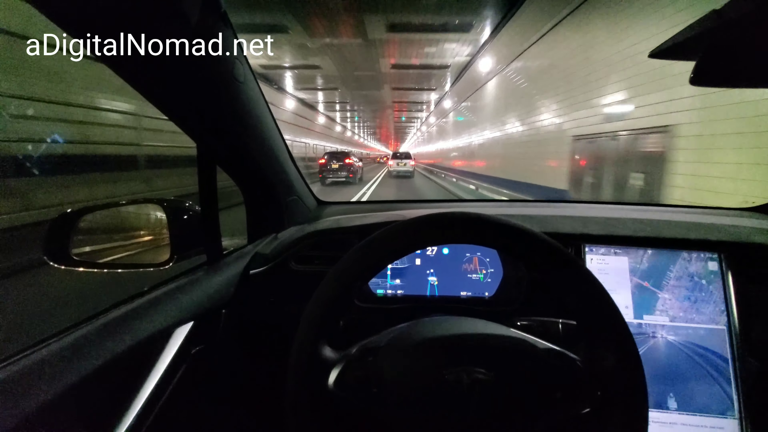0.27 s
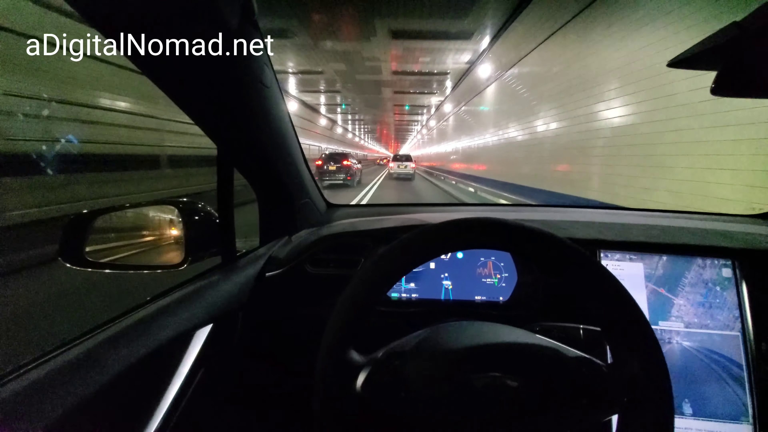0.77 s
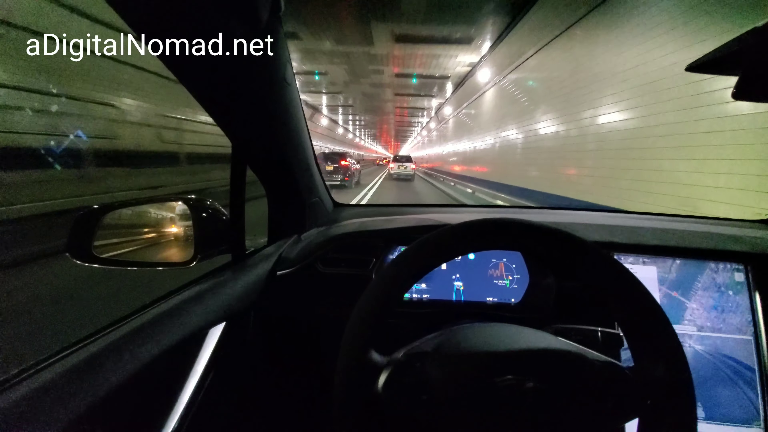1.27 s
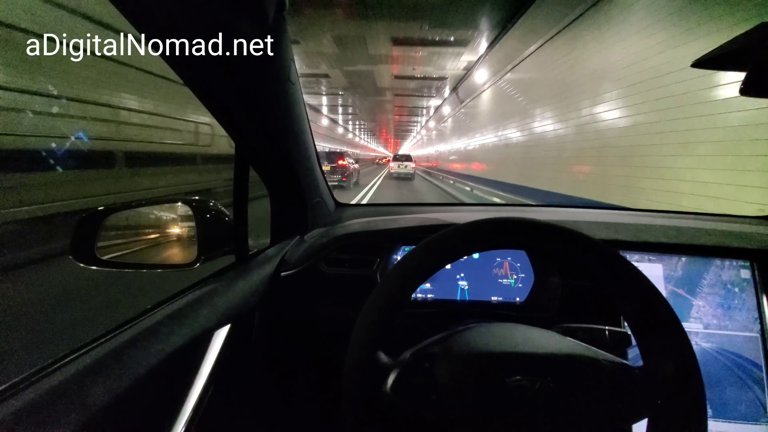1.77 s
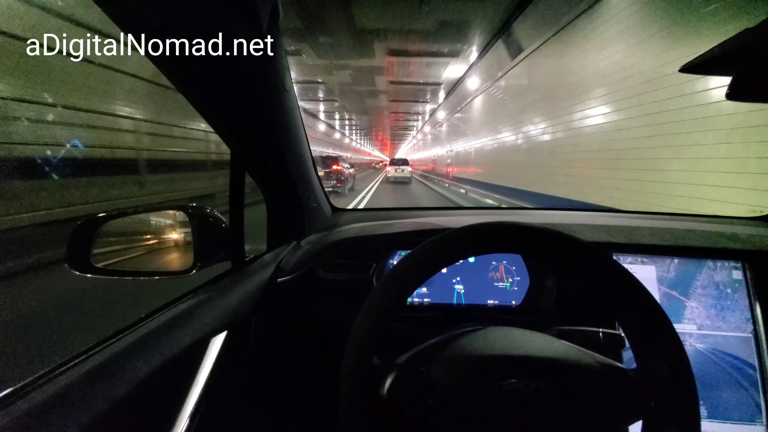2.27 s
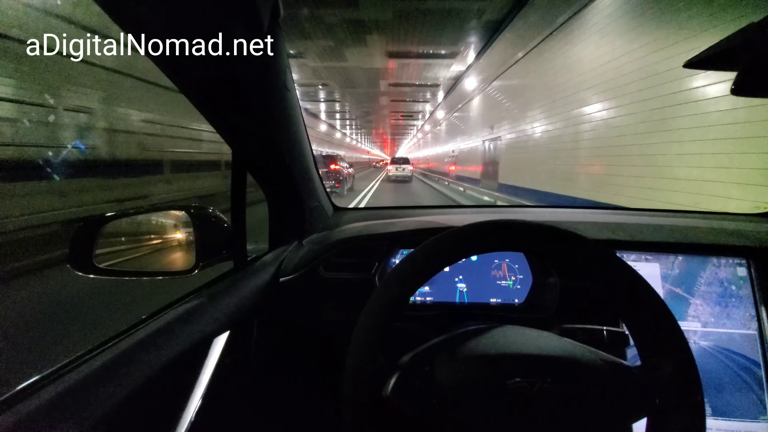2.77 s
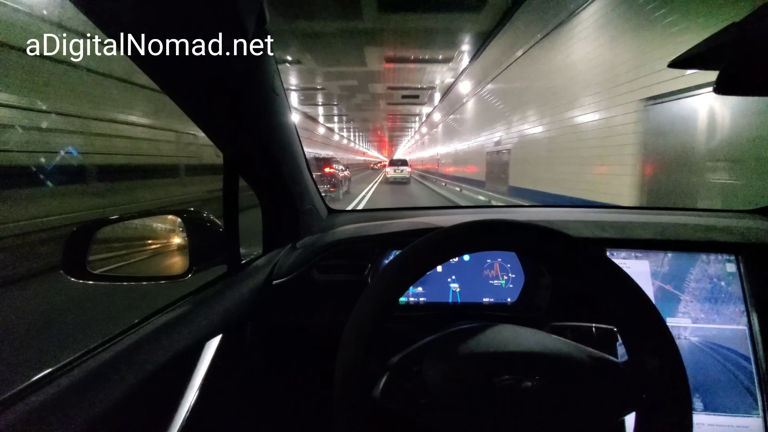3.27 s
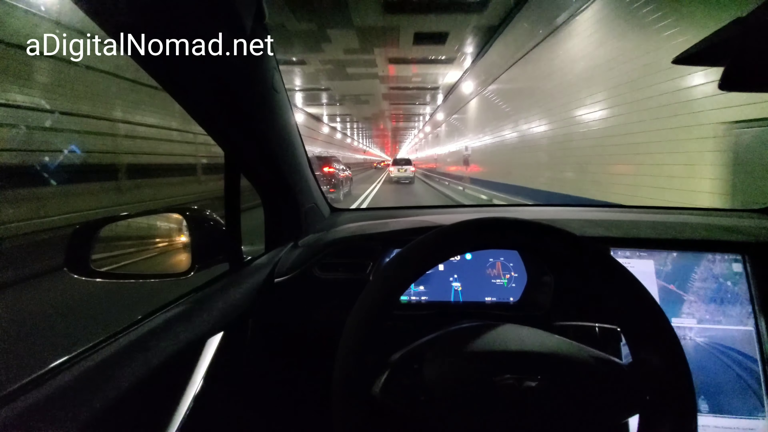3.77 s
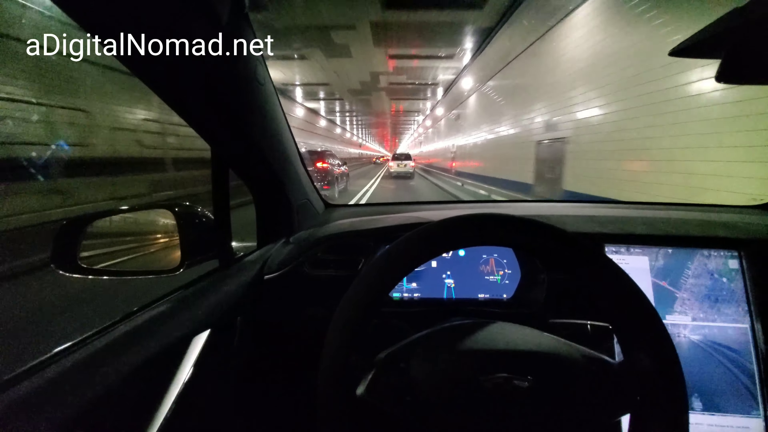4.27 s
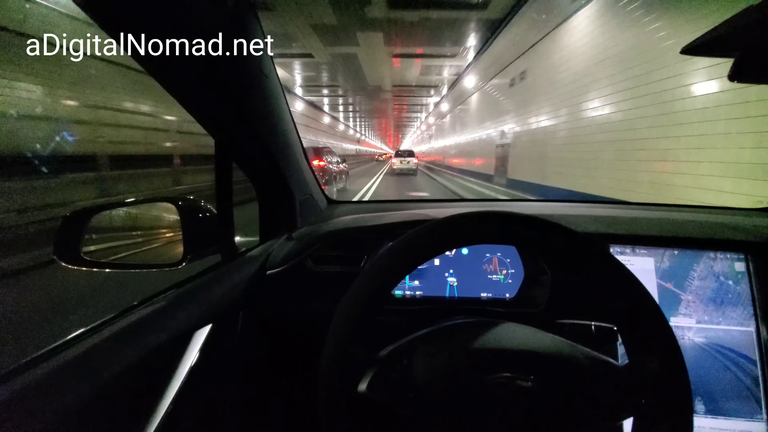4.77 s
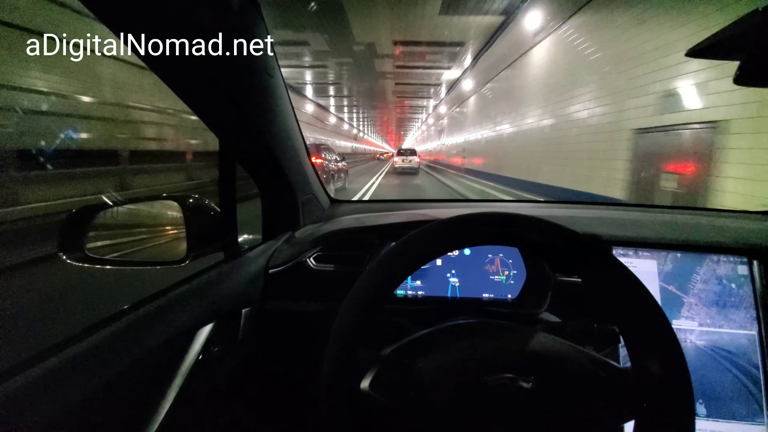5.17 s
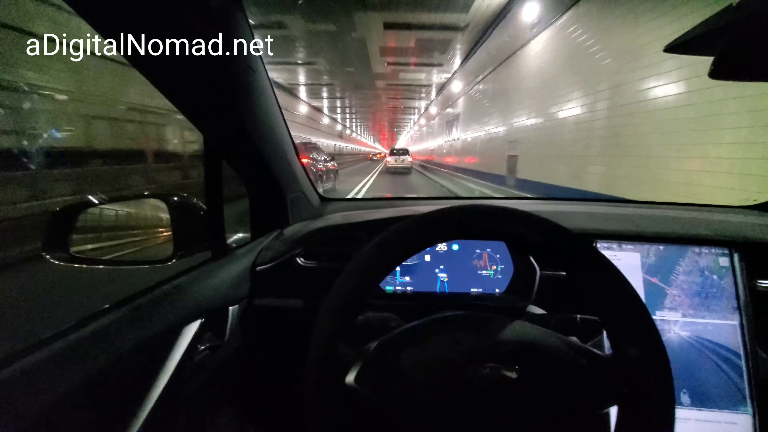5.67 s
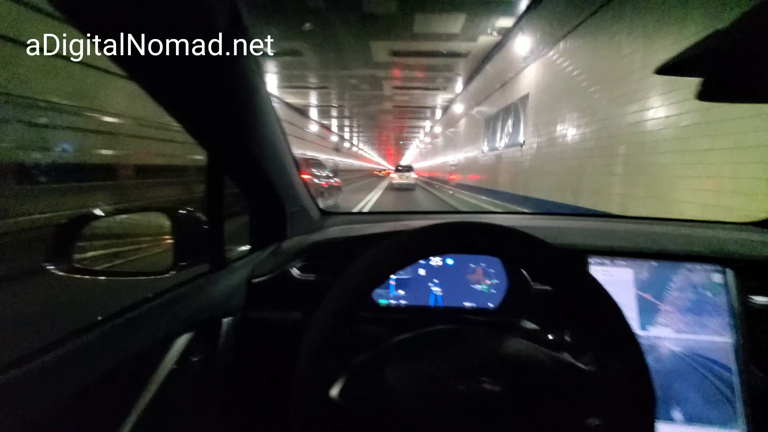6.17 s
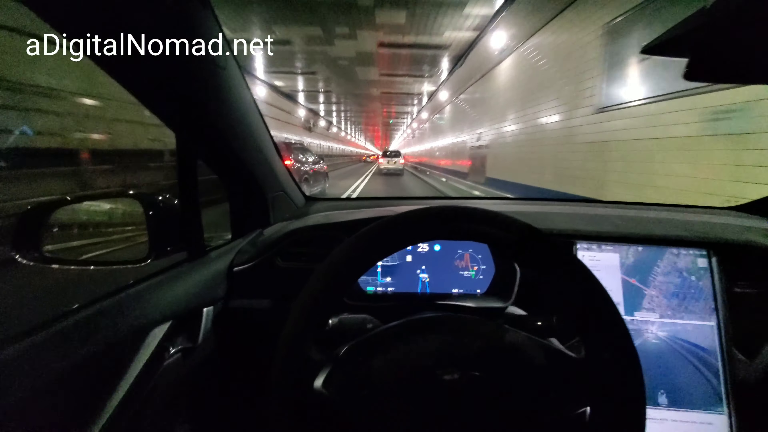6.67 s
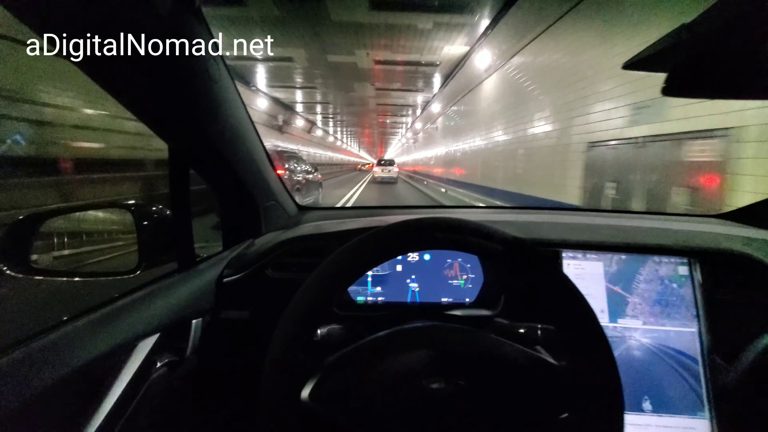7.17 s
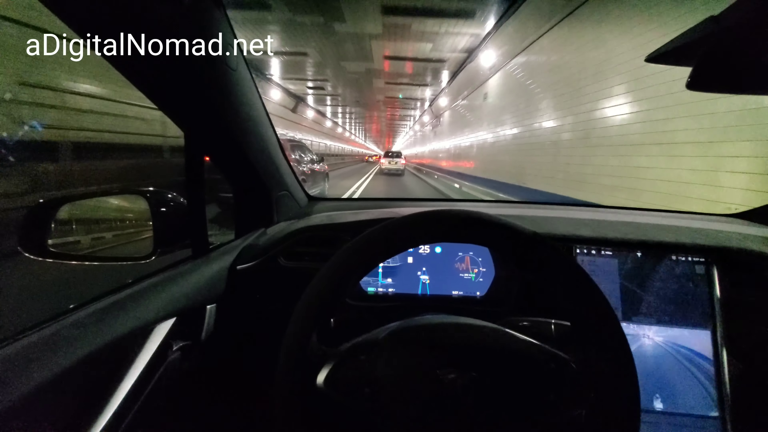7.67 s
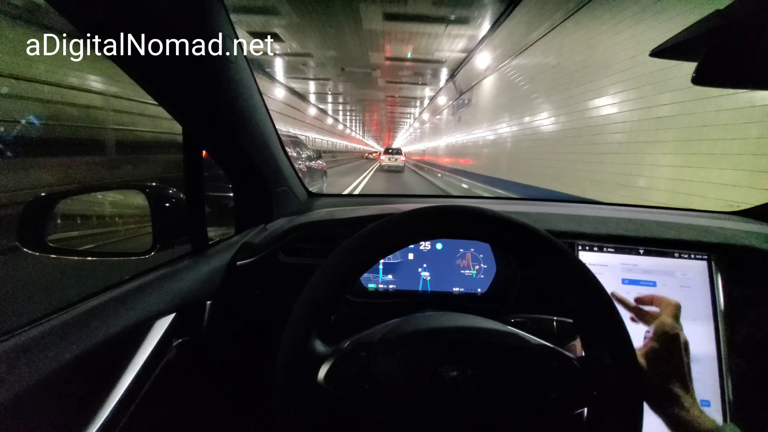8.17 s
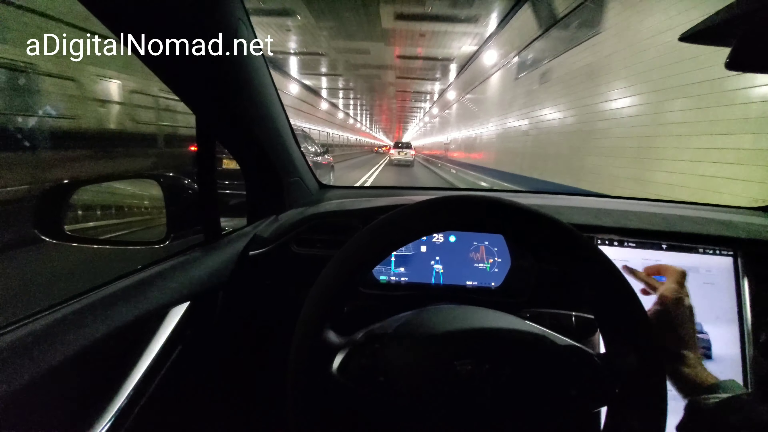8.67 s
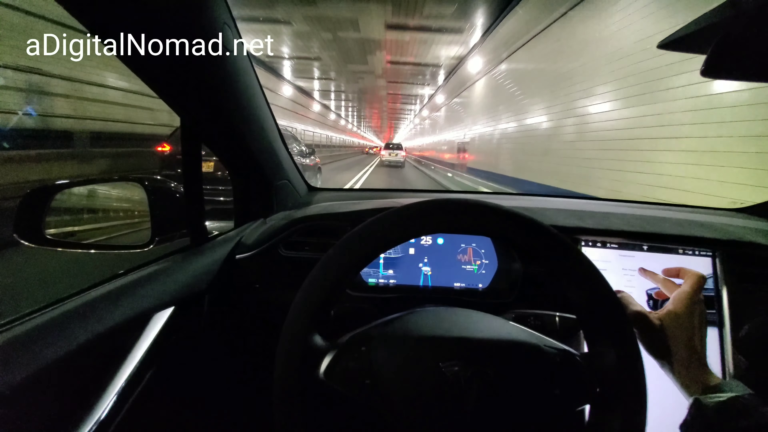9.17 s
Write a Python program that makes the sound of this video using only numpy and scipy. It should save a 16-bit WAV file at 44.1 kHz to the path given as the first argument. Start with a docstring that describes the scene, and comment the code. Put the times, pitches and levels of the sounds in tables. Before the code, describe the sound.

A handheld stereo microphone inside a closed car picks up boomy bass rumble, cabin drone and a wavering low hum. Front then rear wheels zip over ribs with a resonant, tunnel-tailed whoosh. Deep paired thumps rattle loose trim and briefly push the background down. A finger clicks and scuffs very close on the right, another ribbed strip rasps and sings with lighter knocks, then smooth rolling returns with slight sleeve rustle.

```python
"""A low body rumble, drivetrain hum and dull tyre roar: inside an electric car rolling through a road tunnel.
Filtered noise makes the rumble and roar, wavering sines of one turning shaft the hum.
Front and rear axle rasp over two ribbed strips (resonant noise); bumps at a joint between them and on the
second strip thud (body modes struck by pushes), rattle the trim and duck the gain.
Close by, a sleeve rustles, a finger clicks and scuffs on the camera, then brushes the touch screen."""
import sys
import numpy as np
from scipy import signal
from scipy.fft import rfft, irfft, next_fast_len
from scipy.io import wavfile

SR = 44100
rng = np.random.default_rng(int(sys.argv[2]) if len(sys.argv) > 2 else 0)


def waveform_to_disk(signal):
    """Save audio, clipped to [-1, 1], as 16-bit WAV at the path in sys.argv[1]."""
    frames = np.transpose(np.atleast_2d(signal))
    scaled = np.clip(frames, -1, 1) * 32767
    samples = np.round(scaled).astype(np.int16)
    wavfile.write(sys.argv[1], SR, samples)


N = 415422
T = np.arange(N) / SR
SIZE = next_fast_len(N, real=True)
HZ = np.maximum(np.arange(SIZE // 2 + 1) * SR / SIZE, 1)

# All spectra below are relative: f/Hz, level per Hz/dB.
# road surface: t/s, unevenness/dB, coarseness of its grain/dB
ROAD_SURFACE = [(0.4, 2.5, -0.7), (1.7, -2, -1.4), (2.6, 0.6, 0.2), (4.6, 0, 0.5), (5.5, 5, 2),
                (7.3, -1.5, -2), (9.4, 0, -1)]
# spectrum of body rumble: f/Hz, level/dB
RUMBLE_SPECTRUM = [(11, -32.5), (18, -13), (38, 5), (81, 2), (100, 2), (130, -36), (220, -120)]
# spectrum of cabin-air drone: f/Hz, level/dB
DRONE_SPECTRUM = [(80, -27), (100, 0), (125, 1), (155, -2), (195, -10.5), (260, -12), (345, -15.5),
                  (378, -11), (410, -17.5), (480, -20.5), (700, -42)]
# spectrum of tyre roar: f/Hz, level/dB
ROAR_SPECTRUM = [(250, -41.5), (420, -12.5), (466, -12), (533, -2.5), (636, -4), (815, -0.5), (1050, -7.5),
                 (1290, -10), (1930, -10.5), (2420, -16.5), (3010, -17.5), (3630, -25.5), (4240, -37),
                 (5000, -47), (6500, -78.5), (11000, -120)]
# drivetrain: t/s, pitch of the third shaft order f/Hz
THIRD_ORDER_PITCH = [(0, 107.3), (1.8, 107.1), (3.3, 106.4), (5.5, 106), (6.9, 108.5), (8.16, 111.9),
                     (8.8, 114.2), (9.42, 114.7)]
# steady shaft orders: order -> level/dB
STEADY_ORDERS = {3: -32, 4: -38.5, 8: -52}
# an order booms for a while: order, middle t/s, half length/s, level/dB
ORDER_BOOMS = [(3, 0.67, 0.76, -22.5), (3, 7.65, 0.55, -22), (4, 3.7, 2.1, -38), (8, 3.26, 0.13, -37.5),
               (8, 2.7, 0.69, -47.5), (4, 8.5, .45, -37.5)]
# fingertip on the touch screen: t/s, level/dB, swell/s, t60/s
SCREEN_BRUSHES = [(8.393, -68, .01, .09), (8.432, -68, .015, .15), (8.464, -66, .012, .1),
                  (8.93, -75, .02, .4), (9.05, -74, 0.034, 0.12)]
# spectrum of skin on glass: f/Hz, level/dB
BRUSH_SPECTRUM = [(3600, -4), (4250, 1), (5000, -9), (6200, -3), (8000, -10)]
# strokes of the sleeve: t/s, level/dB, swell/s, hold/s, t60/s
SLEEVE_STROKES = [(0, -80, 0.016, 0.45, 0.7), (0.475, -61.5, 0.35, 0.53, 1.4),
                  (2.95, -74, .06, 0.022, 0.82), (3.584, -69, 0.052, 0.018, 0.4), (3.8, -70, 0.36, 1, 2),
                  (5.48, -58, 0.14, 0.35, 6.3), (6.195, -61.5, 0.45, 0.27, 0.32),
                  (7.095, -65.5, 0.31, 0.36, 1.36), (7.799, -69, 0.42, 0.35, 4.2),
                  (8.59, -66, 0.055, .02, .3)]
# spectrum of sliding cloth: f/Hz, level/dB
CLOTH_SPECTRUM = [(1500, -4), (4000, -1), (6000, -1.5), (8000, -3.5), (11000, -3), (15000, 2.5)]
# finger on the camera: t/s, tick level/dB, tick t60/s, knock level/dB, knock pitch f/Hz
FINGER_CLICKS = [(6.2166, -36, 0.0022, -60, 2000), (6.227, -22, .0013, -28, 795),
                 (6.234, -29, 0.0051, -27, 560), (6.236, -20, 0.0016, -13.5, 2120),
                 (6.2543, -27, .003, -25, 1140)]
# modes of the camera case: ratio to the knock pitch, level/dB
CASE_MODES = [(.88, -0.5), (1.15, -0.5), (2.2, -6)]
# spectrum of skin scuffing the case: f/Hz, level/dB
SCUFF_SPECTRUM = [(500, 4), (1200, 0), (3000, -1), (6000, -6), (9500, -0.5), (15000, -14)]
# loose trim rattles: t/s, level/dB, f/Hz, t60/s
TRIM_RATTLES = [(5.553, -45.5, 1700, .16), (5.662, -50, 1400, .12), (5.932, -44, 1620, 0.082),
                (6.555, -33, 323, .35), (6.57, -34.5, 960, 0.27)]
# panel set ringing by a bump: f/Hz, level/dB, t60/s
PING_MODES = [(597, -30, 0.27), (760, -40, .06), (340, -29, .08)]
# shaken trim sizzles: t/s, level/dB, swell/s, t60/s
TRIM_SIZZLES = [(5.549, -39, 0.013, 0.11), (5.612, -45.5, .018, .15), (5.805, -41.5, 0.016, .15),
                (5.823, -37, .004, .06), (5.925, -45, .003, .05)]
# spectrum of sizzling trim: f/Hz, level/dB
TRIM_SPECTRUM = [(500, 16.5), (2300, 7.5), (4500, -1), (9000, -10.5), (15000, -0.5)]
# axle on a ribbed strip: t/s, level/dB, swell/s, time on strip/s, t60/s, rasp level/dB,
# top edge of the ring f/Hz, tunnel tail level/dB, pitch ratio
AXLE_CROSSINGS = [(4.634, -31.5, 0.073, 0.053, 0.74, -3.5, 4600, -12.5, 0.99),
                  (4.848, -32.3, 0.13, 0.05, .95, -4, 4600, -10.5, .998),
                  (6.512, -34.5, 0.062, 0.038, 0.62, -1, 1960, -13.5, 1.007),
                  (6.83, -37.5, 0.11, 0.044, .95, -0.5, 4580, -9, .98)]
# tyre and strip resonances: f/Hz, -3 dB width/Hz, level/dB
STRIP_RESONANCES = [(405, 53, 4.5), (673, 136, 0.5), (815, 80, -7), (1030, 82, -3), (1244, 60, -3),
                    (1494, 80, -6.5), (1895, 115, -5.5), (2050, 100, -3.5), (2490, 200, -7),
                    (2860, 170, -8.5), (3090, 120, -3), (3610, 180, -13.5), (4170, 220, -22.5),
                    (5150, 160, -31), (6000, 100, -25)]
# spectrum of rib rasp through the bodywork: f/Hz, level/dB
RASP_SPECTRUM = [(90, -12.5), (160, 10.5), (270, -5.5), (750, -11), (1400, -11.5), (3100, -13), (4000, -23),
                 (5800, -30.5), (7500, -45)]
# singing front tyres on the second strip: f/Hz, -3 dB width/Hz, level/dB
SQUEAL_RESONANCES = [(866, 50, -3.5), (1104, 77, -5), (1860, 90, -7.5), (2467, 24, 1.5), (2646, 85, -4),
                     (3570, 150, -17), (4050, 60, -21), (4340, 55, -17.5), (5110, 50, -23.5),
                     (5880, 80, -27.5)]
# wheel bumps: t/s, push level/dB, length of first push/s, loss per rebound/dB, panel shudder level/dB
WHEEL_JOLTS = [(5.562, -12, 0.013, 0.5, -26.5), (5.824, -10, 0.013, -1, -31),
               (6.521, -21.5, 0.0056, 1, -31), (6.796, -17.5, 0.00422, 3.5, -38),
               (6.873, -17, 0.01083, 2, -55.5)]
# modes of the car body: f/Hz, level/dB, t60/s
BODY_MODES = [(46.1, -6, 0.36), (69.4, 8.5, 0.078), (107.6, 3, 0.2), (154.8, -0.5, 0.34),
              (293, -14.5, 0.12)]
# spectrum of shuddering panels: f/Hz, level/dB
PANEL_SPECTRUM = [(100, 3), (280, -1.5), (700, -16), (2500, -39.5), (4000, -39.5)]


def from_db(db):
    """Decibels to gain."""
    return 10 ** (np.asarray(db) / 20)


def rms_one(x):
    """Scale to unit rms."""
    return x / np.sqrt(np.mean(x ** 2) + 1e-20)


def in_time(rows):
    """Each column of a curve, interpolated at every sample."""
    t_s, *columns = np.transpose(rows)
    return [np.interp(T, t_s, column) for column in columns]


def colour(points):
    """Gain per frequency of a spectrum, falling steeply past its ends."""
    hz, db = np.transpose(points)
    skirts = np.minimum(1, np.minimum(HZ / hz[0], hz[-1] / HZ)) ** 6
    return from_db(np.interp(np.log(HZ), np.log(hz), db)) * skirts


def dulled(top_hz):
    """Gain per frequency of a steep low-pass."""
    return 1 / np.sqrt(1 + (HZ / top_hz) ** 8)


def resonances(rows):
    """Gain per frequency of broad resonances, summed in power."""
    power = 0
    for hz, width_hz, db in rows:
        peak = from_db(db) / (1 + (1.3 * (HZ - hz) / width_hz) ** 2)
        power = power + peak ** 2
    return np.sqrt(power)


def rippled(depth_db=2.5, spacing_hz=45):
    """Gain per frequency of fine random peaks and dips, unit rms."""
    knots_hz = np.arange(0, SR / 2, spacing_hz)
    ripple_db = depth_db * np.interp(HZ, knots_hz, rng.standard_normal(len(knots_hz)))
    return rms_one(from_db(ripple_db))


def pan(left_db):
    """Left and right gains; left_db is left over right."""
    return from_db(np.array([[left_db], [-left_db]]) / 2)


def drift(rate_hz):
    """Low-passed noise of unit rms."""
    spectrum = rfft(rng.standard_normal(SIZE)) / (1 + (HZ / rate_hz) ** 2) ** 2
    return rms_one(irfft(spectrum, SIZE)[:N])


def diffuse(gain, drive=None, mic_spacing_m=0.19, sound_speed_m_per_s=343):
    """Sound from all sides: two spaced microphones agree on long waves only."""
    coherence = np.sinc(2 * HZ * mic_spacing_m / sound_speed_m_per_s)
    noise = rng.standard_normal((2, SIZE)) if drive is None else drive
    a, b = rfft(noise, SIZE) * gain
    mid, side = irfft([a * np.sqrt(1 + coherence), b * np.sqrt(1 - coherence)], SIZE)[:, :N]
    return np.array([mid + side, mid - side]) / np.std(mid)


def ring(force, modes):
    """A force drives two-pole resonators, which ring as decaying sines."""
    out = 0
    for hz, db, t60_s in modes:
        radius = np.exp(-np.log(1000) / (t60_s * SR))
        angle = 2 * np.pi * hz / SR
        poles = [1, -2 * radius * np.cos(angle), radius * radius]
        out = out + from_db(db) * signal.lfilter([0, np.sin(angle)], poles, force + 1e-18)
    return out


def burst(start_s, swell_s, t60_s, hold_s=0):
    """Envelope: smooth rise to 1, hold, exponential fall."""
    out = np.zeros(N)
    live = slice(int(start_s * SR), int((start_s + swell_s + hold_s + 2 * t60_s) * SR))
    age_s = T[live] - start_s
    rise = np.sin(np.pi / 2 * np.clip(age_s / swell_s, 0, 1))
    fall_s = np.maximum(age_s - swell_s - hold_s, 0)
    out[live] = rise * np.exp(-np.log(1000) * fall_s / t60_s)
    return out


def bursts(rows):
    """Summed envelopes of rows of t/s, level/dB, swell/s, t60/s."""
    return sum(from_db(db) * burst(t_s, swell_s, t60_s) for t_s, db, swell_s, t60_s in rows)


def bent(x, ratio):
    """Play a sound at a time-varying pitch ratio."""
    place = np.cumsum(ratio) % N
    return np.array([np.interp(place, np.arange(N), channel) for channel in x])


def rolling(rumble_db=-27.5, drone_db=-31.0, roar_db=-44.5, roar_follows=0.75, patchy_db=0.5):
    """Road texture shakes body and cabin air; tyre roar is a third, patchy noise band."""
    uneven_db, coarse_db = in_time(ROAD_SURFACE)
    body = from_db(uneven_db + rumble_db) * diffuse(colour(RUMBLE_SPECTRUM)) * pan(left_db=1.1)
    cabin = from_db(coarse_db + drone_db) * diffuse(colour(DRONE_SPECTRUM)) * pan(left_db=2.0)
    roar_level_db = roar_follows * coarse_db + roar_db + patchy_db * drift(rate_hz=23)
    tyres = from_db(roar_level_db) * diffuse(colour(ROAR_SPECTRUM)) * pan(left_db=1.4)
    return body + cabin + tyres


def drivetrain(waver_db=1.7, wander_rad=0.25):
    """Three orders of one shaft, wavering in level and phase, booming now and then."""
    turns = np.cumsum(in_time(THIRD_ORDER_PITCH)[0]) / 3 / SR
    hum = 0
    for k, steady_db in STEADY_ORDERS.items():
        level = from_db(steady_db)
        for order, middle_s, half_s, db in ORDER_BOOMS:
            if round(order) == k:
                boom = from_db(db) * np.exp(-((T - middle_s) / half_s) ** 4 / 2)
                level = np.hypot(level, boom)
        level = level * from_db(waver_db * drift(rate_hz=5.9))
        hum = hum + level * np.sin(2 * np.pi * k * turns + wander_rad * drift(rate_hz=2.5))
    return np.sqrt(2) * hum * pan(left_db=0.5)  # levels are rms


def touch_screen():
    """Skin slides over glass in short faint swishes."""
    return bursts(SCREEN_BRUSHES) * diffuse(colour(BRUSH_SPECTRUM))


def sleeve(still_hiss_db=-76.5, grain_db=1.0, uneven_db=1.0):
    """Cloth slides in strokes: fine, slightly grainy hiss above a faint steady one."""
    power = from_db(still_hiss_db) ** 2
    for t_s, db, swell_s, hold_s, t60_s in SLEEVE_STROKES:
        power = power + (from_db(db) * burst(t_s, swell_s, t60_s, hold_s)) ** 2
    flutter_db = grain_db * drift(rate_hz=89) + uneven_db * drift(rate_hz=8)
    return np.sqrt(power) * from_db(flutter_db) * diffuse(colour(CLOTH_SPECTRUM)) * pan(left_db=1.5)


def finger(scuff_db=-45.5, tick_band_hz=(3160, 12500), knock_t60_cycles=11):
    """Noise ticks, struck case modes and a skin scuff; ticks and scuff lie far right."""
    ticks, knocks = 0, 0
    for t_s, tick_db, tick_t60_s, knock_db, knock_hz in FINGER_CLICKS:
        ticks = ticks + from_db(tick_db) * burst(t_s, 1 / SR, tick_t60_s) * rng.choice([-1, 1], N)
        tap = np.arange(N) == round(t_s * SR)
        modes = []
        for ratio, db in CASE_MODES:
            hz = ratio * knock_hz
            modes.append((hz, knock_db + db, knock_t60_cycles / hz))
        # the lowest mode swings against the others
        knocks = knocks + ring(tap, modes[:1]) - ring(tap, modes[1:])
    ticks = signal.sosfilt(signal.butter(2, tick_band_hz, "band", fs=SR, output="sos"), ticks)
    slide = burst(start_s=6.227, swell_s=0.038, t60_s=0.03, hold_s=0.005)
    scuff = from_db(scuff_db) * slide * diffuse(colour(SCUFF_SPECTRUM))
    return (ticks + scuff) * pan(left_db=-22.0) + knocks * pan(left_db=-4.0)


def rattles(swell_s=0.0076, width_share=0.19):
    """Shaken trim pieces buzz briefly, each as a noise band at its own pitch."""
    buzz = 0
    for t_s, db, hz, t60_s in TRIM_RATTLES:
        band = diffuse(resonances([(hz, width_share * hz, 0)]))
        buzz = buzz + from_db(db) * burst(t_s, swell_s, t60_s) * band
    return buzz


def panel_ping(start_s=6.792):
    """A bump, as one impulse, sets the modes of a panel ringing."""
    return ring(np.arange(N) == round(start_s * SR), PING_MODES)


def sizzles():
    """Loose trim sizzles after bumps: short bursts of noise."""
    return bursts(TRIM_SIZZLES) * diffuse(colour(TRIM_SPECTRUM)) * pan(left_db=1.5)


def ribbed_strips(slaps_per_s=6000, pitch_waver=0.008,
                  tunnel_swell_s=0.36, tunnel_t60_s=1.7, tunnel_top_hz=2700):
    """Tread slaps on ribs; tyre and strip ring per axle, and the tunnel adds a longer, duller tail."""
    out = 0
    tunnel_gain = resonances(STRIP_RESONANCES) * dulled(tunnel_top_hz)
    for t_s, level_db, swell_s, hold_s, t60_s, rasp_db, top_hz, tunnel_db, pitch in AXLE_CROSSINGS:
        slaps = rng.standard_normal((2, N)) * (rng.random(N) < slaps_per_s / SR)
        axle_rings = [(pitch * hz, width_hz, db) for hz, width_hz, db in STRIP_RESONANCES]
        ringing = diffuse(resonances(axle_rings) * dulled(top_hz) * rippled())
        rasp = from_db(rasp_db) * diffuse(colour(RASP_SPECTRUM) * rippled(), slaps)
        near = bent(ringing + rasp, 1 + pitch_waver * drift(rate_hz=7.94))
        near = burst(t_s, swell_s, t60_s, hold_s) * near
        tail = burst(t_s, tunnel_swell_s, tunnel_t60_s, hold_s) * diffuse(tunnel_gain)
        out = out + from_db(level_db) * (near + from_db(tunnel_db) * tail)
    return out * pan(left_db=1.0)


def tyre_squeal(level_db=-38, pitch_waver=0.009):
    """Front tyres sing on the second strip: resonant noise with a wavering pitch."""
    song = bent(diffuse(resonances(SQUEAL_RESONANCES)), 1 + pitch_waver * drift(rate_hz=20))
    envelope = burst(start_s=6.54, swell_s=0.072, t60_s=0.81, hold_s=0.051)
    return from_db(level_db) * envelope * song * pan(left_db=1.0)


def jolts(shudder_swell_s=0.041, shudder_t60_s=0.42, pushes=5,
          first_gap_pushes=1.6, gap_growth=1.31, push_growth=1.106):
    """A hit and its ever slower rebounds ring the body, long pushes only low modes; panels shudder."""
    force, shudder = np.zeros(N), 0
    for t_s, db, first_length_s, loss_db, shudder_db in WHEEL_JOLTS:
        shudder = shudder + from_db(shudder_db) * burst(t_s, shudder_swell_s, shudder_t60_s)
        for k in range(pushes):
            length_s = first_length_s * push_growth ** k
            during = slice(int(t_s * SR), int((t_s + length_s) * SR))
            turn = np.pi * (T[during] - t_s) / length_s
            push = -np.sin(2 * turn) * np.sin(turn)  # the wheel drops, then is thrown back
            force[during] += from_db(db - loss_db * k) * push / np.abs(push).sum()
            t_s = t_s + first_gap_pushes * first_length_s * gap_growth ** k
    return ring(force, BODY_MODES) + shudder * diffuse(colour(PANEL_SPECTRUM))


def gain_control(x, threshold_db=-18.0, squeeze=0.71, window_s=0.072, attack_s=0.086,
                 release_db_per_s=4.0):
    """Level above the threshold turns the gain down; the cut is released at a constant dB rate."""
    pole, lag = np.exp(-1 / (window_s * SR)), np.exp(-1 / (attack_s * SR))
    power = signal.lfilter([1 - pole], [1, -pole], np.mean(x ** 2, axis=0))
    level_db = 10 * np.log10(power + 1e-12)
    cut_db = squeeze * np.maximum(level_db - threshold_db, 0)
    released_db = release_db_per_s * T
    held_db = np.maximum.accumulate(cut_db + released_db) - released_db
    return x * from_db(-signal.lfilter([1 - lag], [1, -lag], held_db))


def scene():
    """Everything heard from the driver's seat, background first."""
    background = rolling() + drivetrain()
    close_by = touch_screen() + sleeve() + finger()
    shaken = rattles() + panel_ping() + sizzles()
    return background + close_by + shaken + ribbed_strips() + tyre_squeal() + jolts()


def record(dry):
    """Microphone drops the deepest bass, gain ducks under loud thuds, the top is cut."""
    thinned = signal.sosfilt(signal.butter(2, 22, "high", fs=SR, output="sos"), dry)
    top_cut = signal.ellip(10, 0.1, 80, 15600, fs=SR, output="sos")  # ripple/dB, stop/dB, f/Hz
    return signal.sosfilt(top_cut, gain_control(thinned))


dry = scene()
out = record(dry)
waveform_to_disk(out)
```